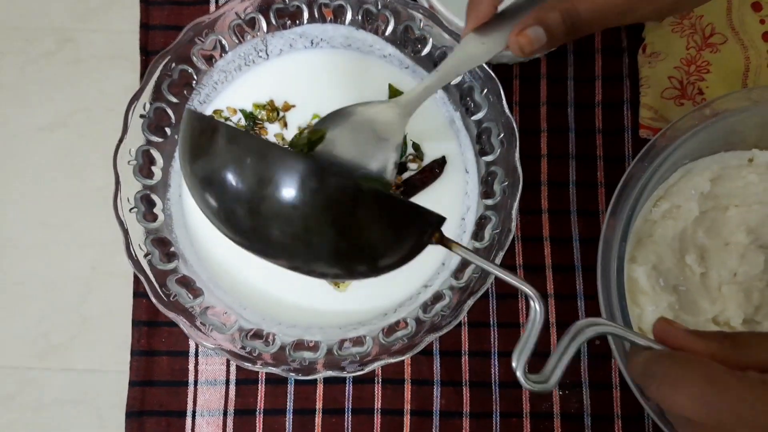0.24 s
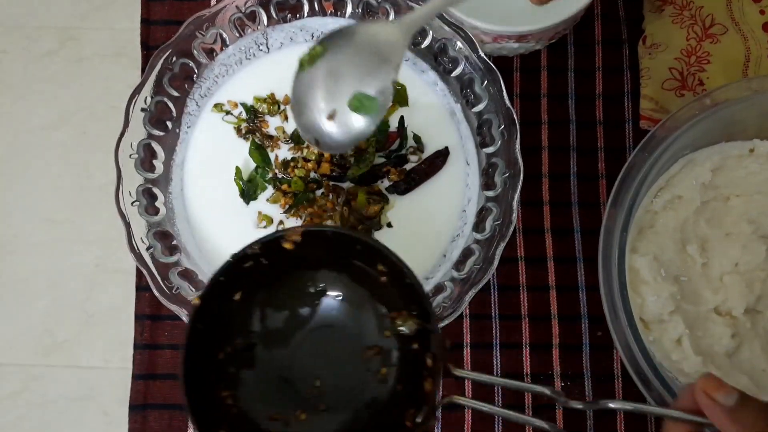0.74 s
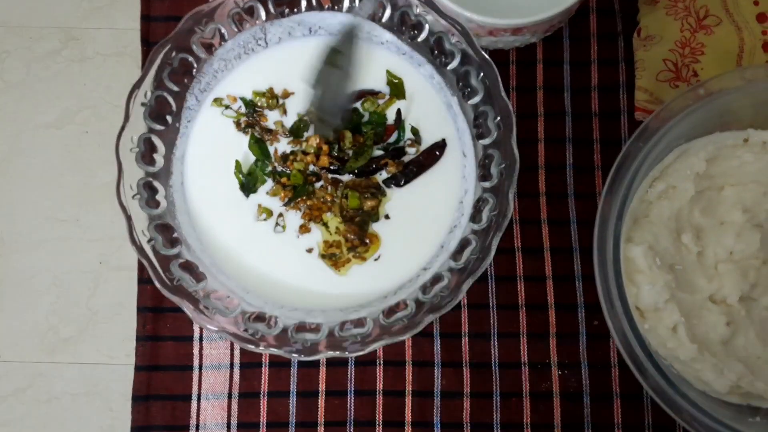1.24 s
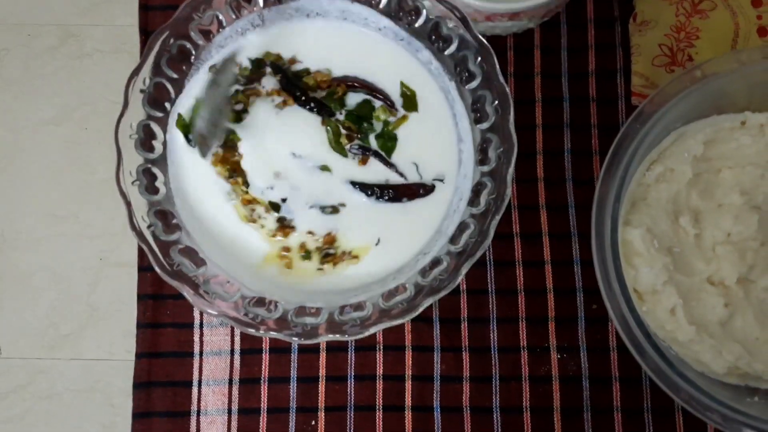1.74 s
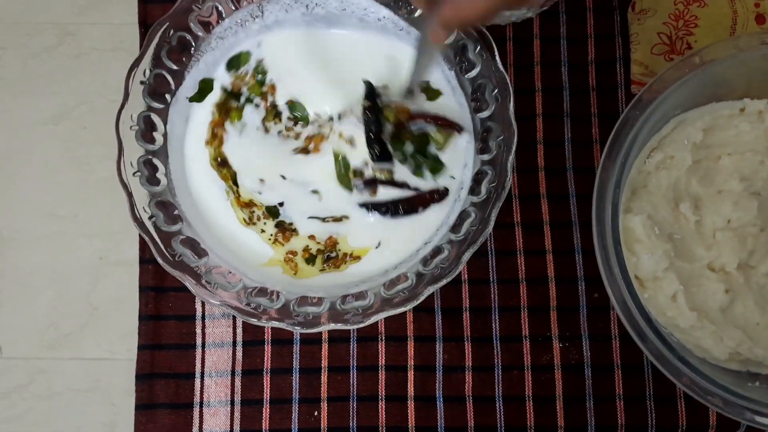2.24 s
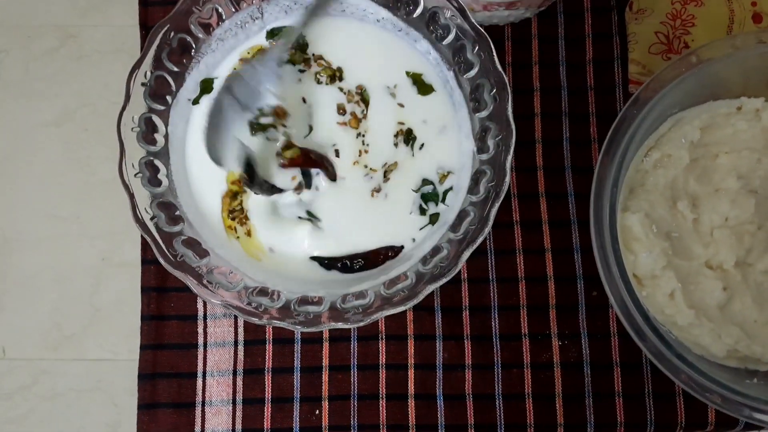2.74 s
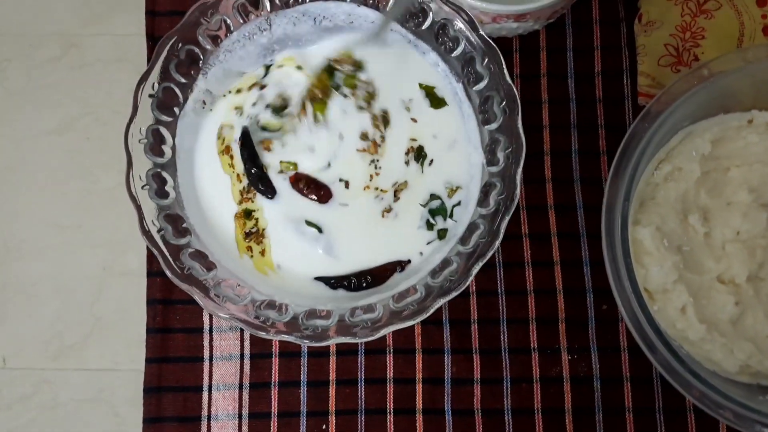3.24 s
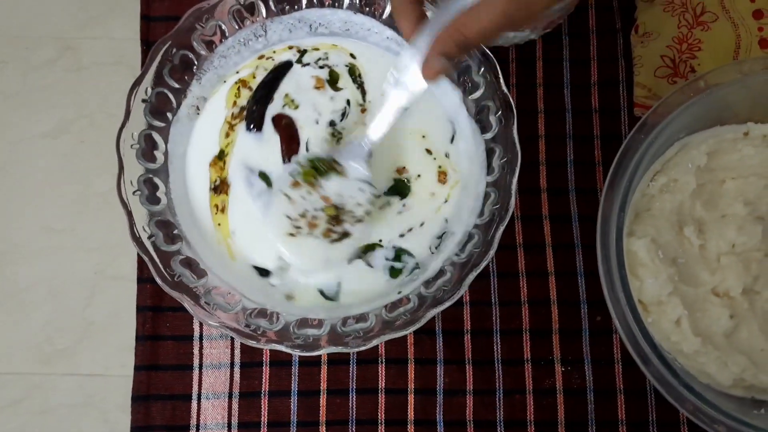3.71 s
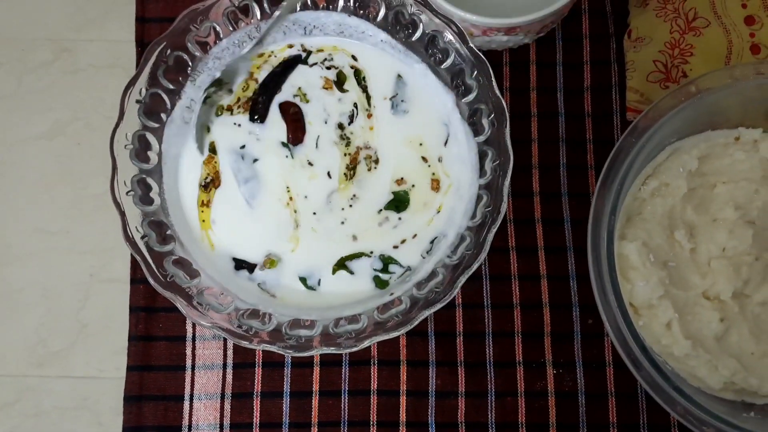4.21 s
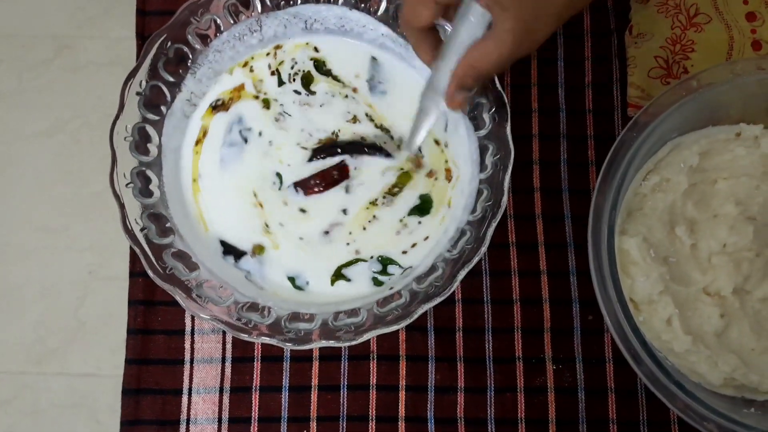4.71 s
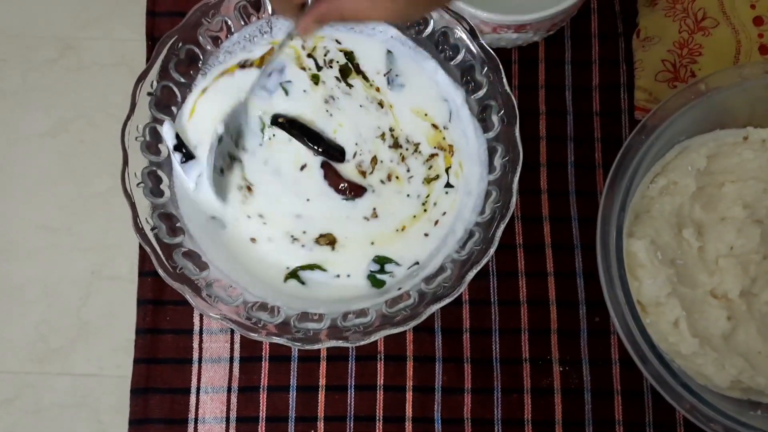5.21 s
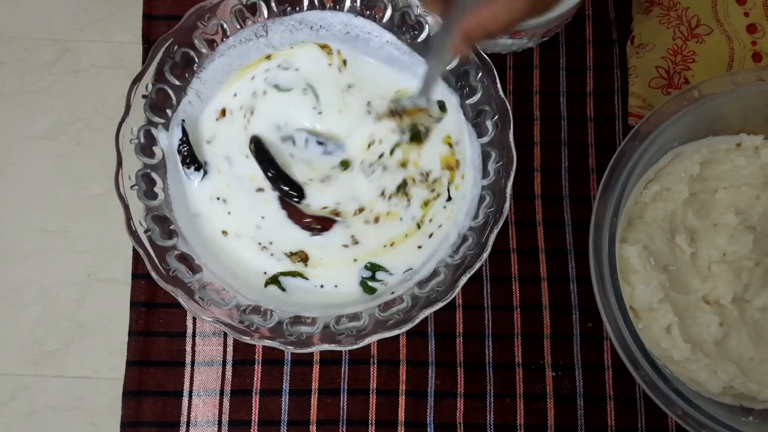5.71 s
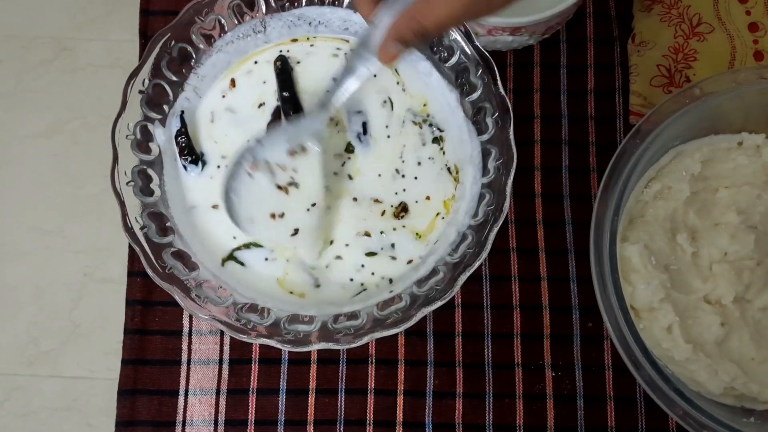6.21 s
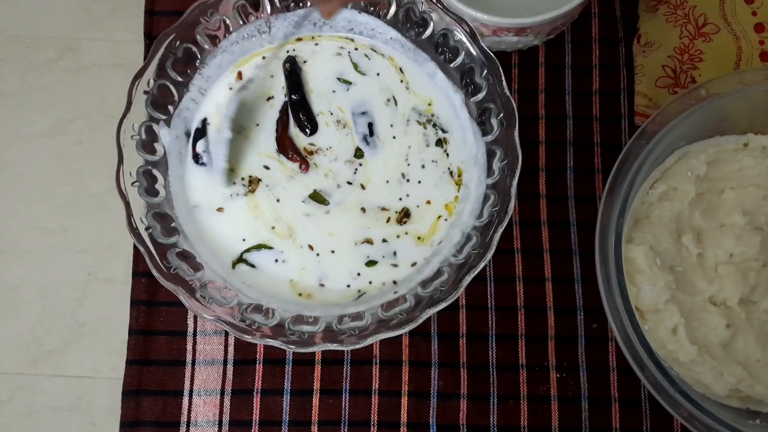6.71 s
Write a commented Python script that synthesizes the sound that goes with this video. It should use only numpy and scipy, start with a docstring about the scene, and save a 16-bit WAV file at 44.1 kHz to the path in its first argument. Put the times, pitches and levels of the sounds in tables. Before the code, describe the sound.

In a hard-walled kitchen, harsh metal scraping ends in a juddering squeal, followed by wet crackly stirring and damped spoon knocks on a glass bowl.

```python
"""In a hard-walled kitchen, a steel spoon scrapes fried seasoning out of a small pan and judders off
its rim, then stirs thick curd in a glass bowl. Friction is random slips through resonances or spectra;
knocks are shaped contacts plus decaying bowl modes; ticks are band-shaped clicks; hollow plinks are
decaying tones of wobbling pitch. An echo and a diffuse tail answer, over rumble, hiss and a far-off hum."""
import sys
import numpy as np
from scipy import signal
from scipy.fft import rfft, irfft, next_fast_len
from scipy.io import wavfile
from scipy.ndimage import uniform_filter1d

SR = 44100
rng = np.random.default_rng(int(sys.argv[2]) if len(sys.argv) > 2 else 0)


def put_to_file(sound):
    """Save the sound as 16-bit audio at rate SR, in the file named by the first command-line argument."""
    columns = np.atleast_2d(sound).T  # one column per channel
    safe = np.clip(columns, -1, 1)
    whole_steps = np.round(safe * 32767)
    wavfile.write(sys.argv[1], SR, whole_steps.astype(np.int16))


N = 306495
TIME = np.arange(N) / SR


def amp(db):
    """Logarithmic level: decibels to linear gain."""
    return 10 ** (np.asarray(db) / 20)


def evened(x):
    """Power normalisation: scales to rms 1."""
    return x / np.sqrt(np.mean(x ** 2) + 1e-20)


def decay(t, t60):
    """Exponential damping: a fall of 60 dB in the time t60."""
    return np.exp(-np.log(1000) * t / t60)


def read(points, hz, axis=1):
    """Spectral interpolation: one table column, joined by lines over log frequency."""
    points = np.asarray(points, float)
    return np.interp(np.log(hz + 1), np.log(points[:, 0] + 1), points[:, axis])


def add(mix, s, sound):
    """Superposition: lays a sound into the mix, in place, at time s."""
    part = mix[..., max(round(s * SR), 0):][..., :sound.shape[-1]]
    part += sound[..., :part.shape[-1]]


def filtered(x, gain):
    """Linear filtering: applies a gain given as a function of frequency."""
    size = next_fast_len(x.shape[-1] + 4096)
    hz = np.fft.rfftfreq(size, 1 / SR)
    return irfft(rfft(x, size) * gain(hz), size)[..., :x.shape[-1]]


def coloured(x, spectrum):
    """Spectral shaping: gives a signal a spectrum, at rms 1."""
    return evened(filtered(x, lambda hz: amp(read(spectrum, hz))))


def ringing(x, modes):
    """Modal resonance: a parallel bank of damped oscillators driven by x, at rms 1."""
    def response(hz):
        return sum(amp(db) * hz * width / (hz * width + 1j * (hz ** 2 - f ** 2))
                   for f, width, db in modes)
    return evened(filtered(x, response))


def grit(per_s, spread_db, size):
    """Stick-slip excitation: tiny slips at random moments, a few of them large."""
    strength = amp(spread_db * np.minimum(rng.exponential(1, size), 4))
    happens = rng.random(size) < per_s / SR
    return evened(rng.standard_normal(size) * strength * happens)


def steadied(x, size=130):
    """Stick-slip saturation: strength follows the pressure, not chance."""
    return x / np.sqrt(abs(uniform_filter1d(x ** 2, size=size)) + 1e-9)


def registers(x, gains, borders_hz):
    """Band splitting: each register of a friction sound gets its own gain."""
    total = 0
    for low, high, gain in zip(borders_hz, borders_hz[1:], gains):
        band = filtered(x, lambda hz: (hz >= low) & (hz < high))
        total = total + evened(band) * gain
    return total


def bursts(rows, t):
    """Contact pressure: a Gaussian swell of the spoon for each row."""
    return sum(amp(db) * np.exp(-.5 * ((t - s) / length) ** 2) for s, db, length in rows)


def click(colour_db, length_s, size=2048):
    """Impact excitation: a short noise burst through a minimum-phase, hence causal, filter."""
    hz, t = np.fft.rfftfreq(size, 1 / SR), np.arange(size) / SR
    chatter = rfft(rng.standard_normal(size) * np.exp(-(t / length_s) ** 2))
    chatter /= np.sqrt(uniform_filter1d(abs(chatter) ** 2, size=60))  # evens out its spectrum
    log_gain = np.log(amp(colour_db(hz)))
    mirrored = np.r_[log_gain, log_gain[-2:0:-1]]
    causal = np.exp(np.conj(signal.hilbert(mirrored)))[:len(hz)]
    return irfft(chatter * causal)[:size // 2]


# resonances of the pan: f/Hz, width/Hz, level/dB
PAN_RESONANCES = [(797, 20, -1), (1187, 120, 1), (1640, 14, 1), (2100, 36, -34), (2270, 140, 2),
                  (2510, 60, 3), (3050, 140, -3), (4020, 68, -3), (7920, 60, -3), (11720, 45, -17),
                  (13500, 300, -11), (15300, 80, -14)]
# broad rasp of the spoon edge on the pan: f/Hz, relative density/dB per Hz
PAN_RASP_SPECTRUM = [(250, -16.5), (480, -25), (720, -5.5), (1150, -6.5), (1700, 0.5), (2300, -3.5),
                     (3200, -11), (4600, -15.5), (8100, -16.5), (9400, -28), (11300, -12), (16000, -24)]
# how hard the spoon bears on the pan: t/s, pressure level/dB
PAN_PRESSURE_CURVE = [(0.0, -39.5), (0.06, -44), (0.068, -38), (0.152, -37.5), (0.252, -31), (0.29, -37.5),
                      (0.324, -34), (0.352, -61), (0.376, -32), (0.444, -55), (0.47, -39)]
# the spoon catches on the pan: t/s, relative level/dB, length/s
PAN_CATCHES = [(0.098, -38, .005), (0.252, -34, 0.018), (0.309, -27.5, 0.0071), (0.326, -31, 0.0026),
               (0.3755, -27, 0.0028), (0.388, -29, .003), (0.406, -36, .006)]
# resonances of a catch: f/Hz, width/Hz, level/dB
CATCH_RESONANCES = [(2224, 30, 8), (3150, 67, -37), (1267, 73, -5), (3300, 63, -11)]
USUAL_PRESSURE_DB = -40
BELLY_S = 0.18  # the spoon passes the belly of the pan, where the low ring is fullest
DESCENT_DB_PER_S, CLIMB_DB_PER_S = 8, 82  # low ring gained on the way down, lost going up the wall


def pan_scrape(rasp_db=-1, low_db=-41, middle_db=-43.5, high_db=-48.0, follow=1.3, high_follow=0.3,
               catch_db=-1.5, release_s=0.008):
    """Driven resonance: slips excite the pan, the treble least swayed by pressure; catches squawk."""
    t = TIME[:SR]
    when, pressure_db = np.transpose(PAN_PRESSURE_CURVE)
    slips = grit(per_s=3000, spread_db=0.5, size=SR)
    rasp = amp(rasp_db) * coloured(slips, PAN_RASP_SPECTRUM)
    steady = evened(ringing(slips, PAN_RESONANCES) + rasp)
    press = np.interp(t, when, pressure_db) - USUAL_PRESSURE_DB
    off_belly = np.maximum(DESCENT_DB_PER_S * (BELLY_S - t), CLIMB_DB_PER_S * (t - BELLY_S))
    gains = amp([low_db + follow * press - off_belly,
                 middle_db + follow * press,
                 high_db + high_follow * press])
    release = np.exp(-np.maximum(t - when[-1], 0) / release_s)
    drag = registers(steady, gains, [200, 1450, 4500, 17000]) * release
    squawk = steadied(ringing(rng.standard_normal(SR), CATCH_RESONANCES))
    catches = amp(catch_db) * squawk * bursts(PAN_CATCHES, t)
    return kitchen(drag + catches, wet_db=-8.5, echo_db=-12)


# the spoon judders over the rim: t/s, relative level/dB
RIM_JUDDERS = [(0.494, -26), (0.507, -25), (0.5181, -18), (0.528, -20), (0.537, -23), (0.547, -24.5)]
# resonances of the spoon: f/Hz, width/Hz, level/dB
SPOON_RESONANCES = [(2340, 150, -9), (3114, 330, -3), (4137, 34, 8.5), (4060, 8.3, 7.5), (5340, 100, -15),
                    (6060, 36, 0), (6800, 12, -21), (7100, 49, -35), (8260, 54, 4), (10830, 54, -15),
                    (10950, 91, -19), (11500, 60, -11), (12700, 120, -11), (13000, 62, -11),
                    (13900, 230, -15), (15400, 36, -10)]
# rasp of the spoon on the rim: f/Hz, relative density/dB per Hz
SPOON_RASP_SPECTRUM = [(350, -61), (600, -26), (2370, -4.5), (2610, -1.5), (2990, -11), (3780, -4),
                       (4160, 1), (4650, -3.5), (7620, -2.5), (8160, 3.5), (9620, -26), (10700, -8.5),
                       (16000, -23)]
JUDDER_S = 0.0032
SKID_S, SKID_DB, SKID_WIDTH_S = 0.504, -28.5, 0.018  # one swell of pressure under the judders


def rim_judder(shriek_db=-2.0, rasp_db=-7.0):
    """Saturated stick-slip: the spoon shrieks in its own modes; the pan spreads the rasp into the room."""
    slips = grit(per_s=9000, spread_db=1.5, size=SR)
    swells = [(SKID_S, SKID_DB, SKID_WIDTH_S)] + [(s, db, JUDDER_S) for s, db in RIM_JUDDERS]
    pressure = bursts(swells, TIME[:SR])
    shriek = amp(shriek_db) * steadied(ringing(slips, SPOON_RESONANCES)) * pressure
    rasp = amp(rasp_db) * coloured(slips, SPOON_RASP_SPECTRUM) * pressure
    shriek_in_room = kitchen(shriek, wet_db=-17, echo_db=-8.5, scatter=0.98)
    return shriek_in_room + kitchen(rasp, wet_db=-3, echo_db=-19)


# strokes of the spoon through the curd: start t/s, length/s, relative level/dB, wet squelch level/dB
STROKES = [(1.423, 0.49, -43.5, -5), (1.96, 0.2, -48.5, -11.5), (2.516, 0.2, -49.5, 0),
           (2.825, 0.12, -50, -5), (3.972, 0.079, -46, -13)]
# crackle of the curd: f/Hz, relative density/dB per Hz
CURD_SPECTRUM = [(100, 1.5), (300, 1.5), (700, -20), (1400, 1), (2500, 3), (3600, 5.5), (5000, 6.5),
                 (6500, 5.5), (8000, 10.5), (9400, -0.5), (11000, 0), (15500, -2)]
STIR_ATTACK_S, STIR_FADE_DB = 0.0098, -25.5  # a stroke bites quickly and dies away over its length


def stirring(rub_db=-1, crackle_db=-9):
    """Granular noise: wet films tear and crisp seasoning crackles around the moving spoon."""
    gains = np.zeros((3, N))
    for s, length, db, squelch_db in STROKES:
        t = TIME[:round(length * SR)]
        stroke = np.minimum(t / STIR_ATTACK_S, 1) * amp(db + STIR_FADE_DB * t / length)
        add(gains, s, np.outer(amp([squelch_db, rub_db, crackle_db]), stroke))
    crackle = coloured(grit(per_s=2200, spread_db=4.5, size=N), CURD_SPECTRUM)
    return kitchen(registers(crackle, gains, [90, 2300, 9400, 17000]), wet_db=-2)


# spoon knocks on the bowl: t/s, relative force level/dB, squareness from 0 glancing to 1 full on,
# thud level/dB, hollow body level/dB
BOWL_KNOCKS = [(1.496, -49, 0.25, -13, 0.5), (2.058, -31.5, 0.069, -8, -2), (2.421, -30, 0.77, -15.5, -4),
               (3.546, -32, 0.79, -9.5, -5.5), (3.58, -44.5, 0.27, 1, 1), (4.405, -46.5, 0.3, -0.5, -6),
               (4.851, -37, 0.75, -5, -10.5), (5.3555, -40, 0.46, -5, -2.5), (5.875, -35.5, 0.94, -7, -3)]
# centres of thud, body, clack and edge: f/Hz
KNOCK_CENTRES = [250, 1100, 2400, 6000]
# colour common to all knocks: f/Hz, level/dB
KNOCK_SPECTRUM = [(40, -31), (125, 1), (260, 5), (420, -6.5), (750, -12), (1200, -5), (1650, -9.5),
                  (2400, -6.5), (4500, -16.5), (8000, -18), (9300, -36.5), (12000, -36.5), (16000, -43)]
# modes of the glass bowl: f/Hz, level/dB, t60/s
GLASS_MODES = [(529.7, 1.5, 0.66), (854, -13.5, 0.24), (1172, -7, 0.13), (1300, -9.5, 0.39),
               (1994, -11, 0.16), (2320, -22, 0.23), (2286, -7.5, 0.2), (2546, -12.5, 0.17),
               (3096, -17, 0.35), (3320, -16, 0.19)]
CLACK_DB, EDGE_DB, RING_DB = (-9, 2.5), (7, -2), (-22, -5)  # (glancing, full on), relative to force
BOOM_HZ, BOOM_FORCE_DB, BOOM_PER_DB = 122, -42, 0.43  # harder blows reach deeper into the counter


def knocks(level_db=49.5, ring_db=3, place_db=3):
    """Modal excitation of curd-damped glass: full blows clack and ring, glancing ones snap; all thud
    through the counter."""
    out, t = np.zeros((2, N)), TIME[:SR * 3 // 4]
    for s, db, square, thud, body in BOWL_KNOCKS:
        clack, edge, ring = (glancing + square * (full - glancing)
                             for glancing, full in (CLACK_DB, EDGE_DB, RING_DB))
        blow = list(zip(KNOCK_CENTRES, [thud, body, clack, edge]))
        boom = [(BOOM_HZ, thud + BOOM_PER_DB * (db - BOOM_FORCE_DB))]
        contact = click(lambda hz: read(boom + blow, hz) + read(KNOCK_SPECTRUM, hz), length_s=0.0018)
        add(out, s, kitchen(amp(db + level_db) * contact, wet_db=1.5, echo_s=.0145, echo_db=-7.0))
        drive = [(GLASS_MODES[0][0], ring)] + blow[1:]
        for f, mode_db, t60 in GLASS_MODES:
            # the place of the blow favours some modes
            favour_db = place_db * rng.uniform(-1.6, 1)
            strength = amp(db + ring_db + mode_db + read(drive, f) + favour_db)
            # high modes reach the two microphones out of step
            turns = f * (t + rng.uniform(0, 0.00034, (2, 1))) + rng.random()
            swell = (1 - np.exp(-t * f / 7)) * decay(t, t60)
            add(out, s, strength * swell * np.sin(2 * np.pi * turns))
    return out


# light ticks of spoon and seeds on the glass: t/s, relative level/dB, pitch f/Hz
GLASS_TICKS = [(0.798, -34.5, 5940), (1.271, -38.5, 5500), (1.39, -35, 6340), (1.4332, -28, 5800),
               (1.4424, -28, 5960), (1.5728, -33, 6400), (1.648, -29, 6000), (1.966, -39, 5030),
               (2.554, -22, 2880), (2.6537, -31, 4860), (2.796, -31, 4800), (2.838, -33, 6600),
               (2.8439, -22.5, 3900), (2.8829, -18.5, 3580), (3.001, -39.5, 4840), (3.192, -37.5, 3900),
               (3.7637, -32, 4550), (4.716, -34.5, 5500), (5.62, -29.5, 4100), (5.657, -28.5, 4240),
               (6.6456, -41, 5750)]
# colour common to all ticks: f/Hz, level/dB
TICK_SPECTRUM = [(300, -31), (1500, -2.5), (3300, 4.5), (8000, 11.5), (9500, 4.5), (11000, 12), (16000, 6)]
TICK_OCTAVES, FIRM_DB, OCTAVES_PER_DB = 0.85, -24, 0.15  # touches above FIRM_DB have a wider band


def ticks(level_db=10, skirt_db=-12):
    """Broadband contact: touches too light to ring the bowl give a broad band around each pitch."""
    out = np.zeros(N)
    for s, db, pitch_hz in GLASS_TICKS:
        octaves = TICK_OCTAVES + OCTAVES_PER_DB * max(db - FIRM_DB, 0)

        def colour_db(hz):
            distance = np.log2(np.clip(hz, 3160, 11700) / pitch_hz)  # skirts level off outside
            return skirt_db * (distance / octaves) ** 2 + read(TICK_SPECTRUM, hz)

        contact = click(colour_db, length_s=0.00063)
        add(out, s, amp(db + level_db) * contact / np.linalg.norm(contact))
    return kitchen(out, wet_db=-4.0, echo_db=-22)


# the spoon's back rubs along the glass: middle t/s, relative level/dB, length/s
GLASS_RUBS = [(5.105, -54, 0.035), (5.6, -60.5, 0.048), (5.74, -52.5, 0.046)]
# resonances of the rubbing: f/Hz, width/Hz, level/dB
RUB_RESONANCES = [(1760, 97, 10), (2360, 640, 5.5), (3150, 550, 0), (3670, 280, 4.5), (5800, 750, -13),
                  (7200, 900, -19)]


def rubbing(low_db=-4, high_db=1):
    """Sliding friction: the spoon's back grates along the bowl's bottom, muffled by the curd."""
    grate = ringing(grit(per_s=2000, spread_db=3.0, size=N), RUB_RESONANCES)
    grate = registers(grate, amp([low_db, high_db]), [900, 2400, 9000])
    return kitchen(grate * bursts(GLASS_RUBS, TIME), wet_db=-7, echo_db=-18)


# short hollow plinks, several of them the mid note of a knock on the bowl:
# t/s, f/Hz, relative level/dB, t60/s
HOLLOW_PLINKS = [(1.4975, 1480, -37, .08), (2.122, 1800, -38, .13), (2.425, 1820, -29, .16),
                 (3.472, 1070, -46, .11), (3.55, 1290, -30, .2), (3.9664, 3570, -37, .02),
                 (4.855, 1880, -41, .14), (5.36, 1400, -43, .15), (6.063, 980, -44, .07)]


def plinks(level_db=1.0):
    """Damped oscillation: decaying tones, each roughened by a slight random wobble of pitch."""
    out, t = np.zeros(N), TIME[:SR // 5]
    for s, hz, db, t60 in HOLLOW_PLINKS:
        wobble = .02 * evened(uniform_filter1d(rng.standard_normal(len(t)), size=120))
        turns = np.cumsum(hz * (1 + wobble)) / SR
        add(out, s, amp(db) * decay(t, t60) * np.sin(2 * np.pi * turns))
    return kitchen(amp(level_db) * out, wet_db=-9.5)


# the kitchen: f/Hz, t60/s, reverberant over direct level/dB before each source's wet_db,
# build-up/s, left-right likeness from 0 to 1
KITCHEN_ACOUSTICS = [(156, 0.25, 25, 0.031, 0.91), (497, 0.84, 13, 0.017, 0.86),
                     (944, 0.35, 4.5, 0.012, 0.072), (2320, 0.47, 2.5, 0.0086, 0.026),
                     (7450, 0.48, -8.5, 0.0064, 0.028), (13900, 0.35, 4.5, 0.012, 0.087)]


def kitchen(x, wet_db, echo_s=.015, echo_db=-11, far_lag_s=0.000177, scatter=1.0):
    """Room acoustics: a direct path, one wall echo and a diffuse, decaying tail."""
    hz, t, z = signal.stft(rng.choice([-1., 1.], (2, SR * 3 // 4)), SR, nperseg=256)
    t60, build, same = (read(KITCHEN_ACOUSTICS, hz, axis=k)[:, None] for k in (1, 3, 4))
    same = np.clip(same, 0, 1)
    z[1] = same * z[0] + np.sqrt(1 - same ** 2) * z[1]
    fade = decay(t, t60) * (1 - np.exp(-(t / build) ** 2))
    fade = fade / np.linalg.norm(fade, axis=1, keepdims=True)
    tail = signal.istft(z * fade, SR, nperseg=256)[1]
    size = next_fast_len(len(x) + SR)
    hz = np.fft.rfftfreq(size, 1 / SR)
    direct = np.exp(-2j * np.pi * np.outer([0, far_lag_s], hz))
    # the far microphone is shadowed: part or all of its sound comes scattered off nearby things
    near, share = rng.standard_normal(size=150), np.clip(scatter, 0, 1)
    scattered = rfft(near / np.linalg.norm(near), size)
    direct[1] = np.sqrt(1 - share) * direct[1] + np.sqrt(share) * scattered
    direct *= 1 + amp(echo_db) * np.exp(-2j * np.pi * hz * echo_s)
    wet = amp(read(KITCHEN_ACOUSTICS, hz, axis=2) + wet_db)
    diffuse = wet * rfft(tail / np.linalg.norm(tail[0]), size)
    paths = (direct + diffuse) / np.sqrt(1 + wet ** 2)
    return irfft(rfft(x, size) * paths, size)[:, :min(N, len(x) + tail.shape[1])]


def leaning(pair, lean):
    """Interchannel level difference: the two microphones differ in colour."""
    return filtered(pair, lambda hz: amp(np.outer([.5, -.5], read(lean, hz))))


# room rumble: f/Hz, relative density/dB per Hz
RUMBLE_SPECTRUM = [(15, -56), (25, -56), (52, -11.5), (119, -6.5), (199, -4.5), (261, -4.5), (446, -6),
                   (661, -16), (1330, -25), (1800, -34), (2340, -113), (3960, -120)]
# microphone hiss: f/Hz, relative density/dB per Hz
HISS_SPECTRUM = [(1000, -20.5), (1700, -17.5), (2360, 4.5), (2740, -13), (3070, -16.5), (3600, -24.5),
                 (3920, -10.5), (4380, -30.5), (5050, -16.5), (7210, -8.5), (7920, 0), (8450, -4),
                 (9370, -35.5), (15000, -23.5), (16000, -67)]
# far-off hum: f/Hz, level/dB
HUM_TONES = [(199.2, -66), (441.4, -68.5)]
# left minus right of the background: f/Hz, level difference/dB
BACKGROUND_LEAN = [(60, 14), (110, 6), (200, 4.5), (380, -1.5), (700, 4), (1290, 4.5), (2380, -3.5),
                   (4400, 2), (8120, 4), (15000, -5)]
RUMBLE_DB, HISS_DB = -62.5, -59.6  # rms levels before the lean


def background(rumble_apart=1.0, hiss_apart=1.0, hum_width_hz=7):
    """Partly coherent noise: room rumble and microphone hiss, with a wavering narrow-band hum."""
    shared = rng.standard_normal(N)
    rumble_noise = shared + rumble_apart * rng.standard_normal((2, N))
    rumble = amp(RUMBLE_DB) * coloured(rumble_noise, RUMBLE_SPECTRUM)
    hiss_noise = shared + hiss_apart * rng.standard_normal((2, N))
    hiss = amp(HISS_DB) * coloured(hiss_noise, HISS_SPECTRUM)
    hum = sum(amp(db) * ringing(rng.standard_normal(N), [(f, hum_width_hz, 0)]) for f, db in HUM_TONES)
    return leaning(rumble + hiss + hum, BACKGROUND_LEAN)


# left minus right of the spoon's work: f/Hz, level difference/dB
WORK_LEAN = [(60, 0.5), (200, 0), (450, 2.5), (800, 1.5), (1300, -0.5), (2400, 5), (4400, -1.5), (8200, 10),
             (9500, -6), (11500, -10.5), (15000, -10)]


def scene(pan_left_db=1, bowl_left_db=0.75):
    """Superposition of sources: first the pan is emptied, then the bowl is stirred."""
    bowl = stirring() + knocks() + ticks() + rubbing() + plinks()
    work = bowl * amp([[bowl_left_db], [-bowl_left_db]])
    pan = pan_scrape() + rim_judder()
    add(work, 0, pan * amp([[pan_left_db], [-pan_left_db]]))
    return leaning(work, WORK_LEAN) + background()


def record(dry):
    """Band limitation: the recorder's linear-phase low-pass at 15.8 kHz."""
    lowpass = signal.firwin(511, 15800, window=("kaiser", 9), fs=SR)
    return signal.oaconvolve(dry, lowpass[None], "same")


dry = scene()
out = record(dry)
put_to_file(out)
```